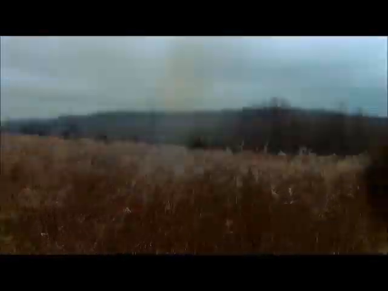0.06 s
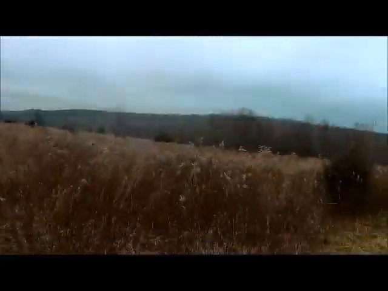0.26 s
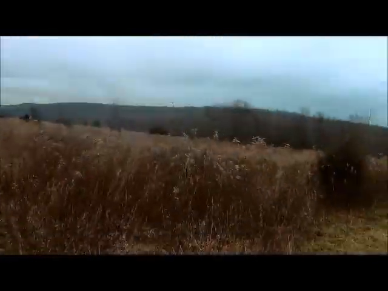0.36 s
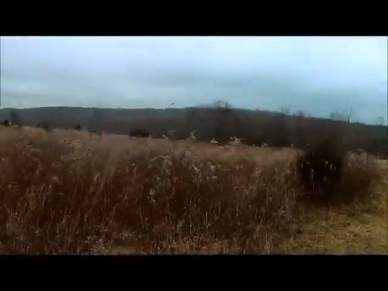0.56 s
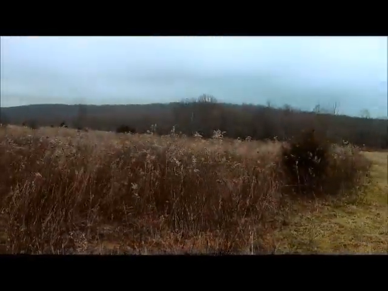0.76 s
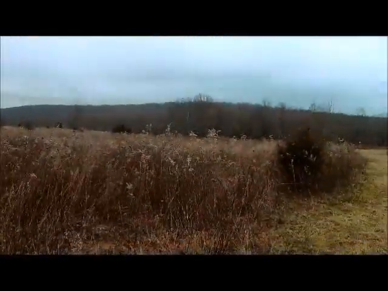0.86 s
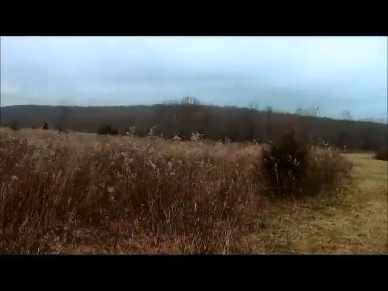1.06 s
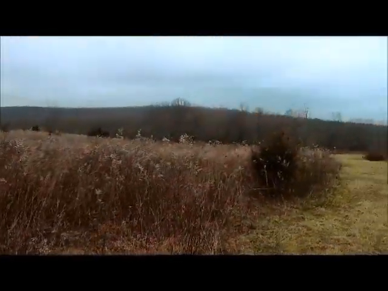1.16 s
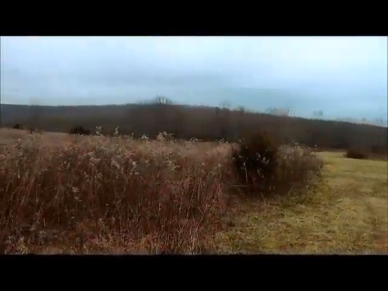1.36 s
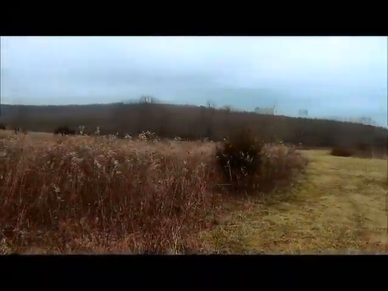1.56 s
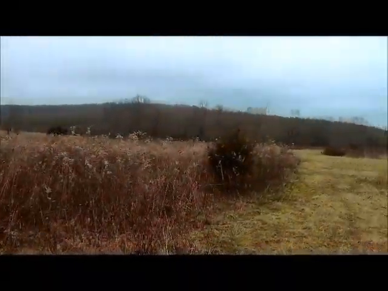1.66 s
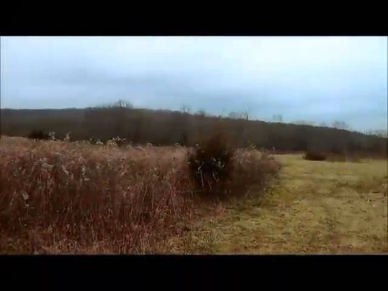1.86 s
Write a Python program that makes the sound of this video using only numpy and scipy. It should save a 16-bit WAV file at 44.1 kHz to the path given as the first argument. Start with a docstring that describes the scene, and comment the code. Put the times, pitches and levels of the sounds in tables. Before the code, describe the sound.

One loud shotgun shot goes off close to the microphone, distorting for an instant. A small metallic click follows, then echoes roll back across the open field and die away, leaving a faint low wind.

```python
"""One shotgun blast in an open field. Light wind blows, then the shot cracks and booms,
overloading a nearby camera microphone. Tall grass scatters a short hiss, bass rolls along the
ground, the barrel hums and the action (the gun's moving parts) clicks. Nearby trees throw the shot
back, then the far tree line and the hills. A few faint handling ticks sound as the echoes fade."""
import sys
import numpy as np
from scipy import signal
from scipy.fft import rfft, irfft
from scipy.io import wavfile
from scipy.ndimage import uniform_filter1d

SR = 44100
rng = np.random.default_rng(int(sys.argv[2]) if len(sys.argv) > 2 else 0)


def file_out(sig):
    """Save sig as 16-bit WAV at sys.argv[1]."""
    # one column per channel
    cols = np.atleast_2d(sig).T
    # limit, then scale
    lim = np.clip(cols, -1, 1)
    pcm = np.round(lim * 32767).astype(np.int16)
    wavfile.write(sys.argv[1], SR, pcm)


N = 83790
T = np.arange(N) / SR
HZ = np.fft.rfftfreq(2 * N, 1 / SR)
SHOT_S = .2358

# A colour says how strong the low and high sounds are. Each row: frequency in Hz, relative level in dB.
CRACK_COLOUR = [(30, -11.5), (300, -15), (1500, -6.5), (2800, 3.5), (5000, 4), (8000, -6), (11500, -19),
                (15000, -12.5)]
BOOM_COLOUR = [(25, -6.5), (65, 10), (110, -2), (175, -1.5), (320, -0.5), (450, 2.5), (800, -1.5),
               (2000, -3.5), (4500, -9), (8000, -4.5), (12000, -34.5), (15000, -23.5)]
# The low push of the muzzle gas. Each row: pitch in Hz, level in dB, seconds to fade by 60 dB.
GAS_PUSH = [(61.2, -7.5, 0.044), (182, -6.5, 0.057), (441.5, -7.5, 0.033)]


def blast():
    """A bright crack, then the muzzle boom and its low push, with a brief chirp of distortion."""
    crack = amp(-4) * colour(burst(delay_s=0, hold_s=.0085, fade_s=.022), CRACK_COLOUR)
    boom = amp(-4.5) * colour(burst(delay_s=.0066, hold_s=.0092, fade_s=.014), BOOM_COLOUR)
    return crack + boom + distortion_chirp() + ring(GAS_PUSH, start_s=SHOT_S + .0085)


def burst(delay_s, hold_s, fade_s):
    """A rush of churning gas that starts at once, holds and collapses."""
    age = T - SHOT_S - delay_s
    return scatter(0, window=48) * (age >= 0) * amp(-60 * np.maximum(age - hold_s, 0) / fade_s)


def distortion_chirp(delay_s=.0062, length_s=.0036, from_hz=450, to_hz=4700):
    """A very short rising tone, like the camera's sound distorting at the loudest moment."""
    progress = np.clip((T - SHOT_S - delay_s) / length_s, 0, 1)
    hz = from_hz + (to_hz - from_hz) * progress ** 2
    arch = np.sqrt(np.sin(np.pi * progress).clip(0))
    return amp(4) * arch * np.sin(2 * np.pi * np.cumsum(hz * (progress > 0)) / SR)


# The barrel's tones. Each row: pitch in Hz, level in dB, seconds to fade by 60 dB.
BARREL_TONES = [(124, -35, 5), (267, -51.5, 0.98)]


def barrel_hum(damp_at_s=.52, fade_s=.3):
    """The air in the barrel hums after the shot until it is damped."""
    return ring(BARREL_TONES, SHOT_S) * amp(-60 * np.maximum(T - damp_at_s, 0) / fade_s)


# The clicks. Each row: start in seconds, gain in dB.
CLICKS = [(0.3933, -8.5), (0.3945, -8.5)]
# The tones of a click. Each row: pitch in Hz, relative level in dB, seconds to fade by 60 dB.
ACTION_TONES = [(2140, -22.5, 0.042), (3800, -9.5, 0.0048), (5540, -2.5, 0.012), (6310, -3, 0.011),
                (8170, -15, 0.0047)]


def action_clicks():
    """The gun's moving parts knock together and ring briefly."""
    return sum(amp(db) * ring(ACTION_TONES, start) for start, db in CLICKS)


# How the hiss and the bass rise and fall. Each row: time in seconds, level in dB.
GRASS_LEVEL = [(.25, -16.5), (.272, -29), (.30, -36.5), (.335, -40), (.38, -41), (.42, -37.5), (.46, -38),
               (.60, -44.5), (.75, -80)]
ROLL_LEVEL = [(.26, -45.5), (.38, -46), (.48, -39), (.56, -35.5), (.65, -42), (.76, -48), (.85, -54)]
# Their colours. Each row: frequency in Hz, relative level in dB.
GRASS_COLOUR = [(60, -16), (250, -0.5), (450, 1), (750, 4), (1100, 0.5), (2000, -5.5), (4400, 0),
                (7500, -4.5), (10500, -17.5), (15000, -19)]
ROLL_COLOUR = [(30, -18.5), (70, -0.5), (130, -8.5), (230, 2.5), (330, 1.5), (480, -17), (900, -48.5)]


def grass_and_ground():
    """Tall grass scatters the shot into a hiss while bass rolls along the ground."""
    hiss = colour(scatter(2) * level(GRASS_LEVEL), GRASS_COLOUR)
    roll = colour(scatter(0) * level(ROLL_LEVEL), ROLL_COLOUR)
    return hiss + roll


# The wash, a blur of many echoes. Each row: time in seconds, level in dB.
NEAR_WASH = [(.44, -74), (.47, -38), (.51, -36), (.555, -37), (.575, -42), (.65, -41), (.72, -48),
             (.78, -52)]
FAR_WASH = [(.74, -50), (.80, -35.5), (.84, -37.5), (.94, -34), (1.04, -34), (1.14, -36.5), (1.25, -38.5),
            (1.38, -42.5), (1.51, -49.5), (1.65, -49.5), (1.76, -50), (1.9, -51)]
# Colours of the wash and of the slaps, single echoes that keep more of the shot's thump.
# Each row: frequency in Hz, relative level in dB.
NEAR_WASH_COLOUR = [(100, -10), (520, -6), (900, -3), (1400, -3), (2200, -1.5), (4500, 0), (7500, -5),
                    (10500, -15), (15000, -18)]
FAR_WASH_COLOUR = [(40, -28), (90, 5.5), (150, 5), (250, 0.5), (340, -12.5), (480, -7.5), (850, 2.5),
                   (1300, -3.5), (2500, -10), (4500, -14.5), (7500, -22), (11000, -19.5), (15000, -25.5)]
NEAR_SLAP_COLOUR = [(60, -15), (150, 7), (330, -5), (540, -1), (900, 5.5), (1400, 3), (2200, -3),
                    (4500, -3), (7500, -7), (10500, -16.5), (15000, -14)]
FAR_SLAP_COLOUR = [(40, -33), (90, -2.5), (150, 6.5), (250, -4.5), (340, -12.5), (480, -2.5), (850, 2),
                   (1300, -12.5), (2500, -13.5), (4500, -21), (7500, -26), (11000, -24), (15000, -29)]


def trees_and_hills(far_from_s=.75):
    """Nearby trees throw the shot back first, then the far tree line and the hills."""
    near = colour(slaps(0, far_from_s), NEAR_SLAP_COLOUR) + colour(wash(NEAR_WASH), NEAR_WASH_COLOUR)
    far = colour(slaps(far_from_s, np.inf), FAR_SLAP_COLOUR) + colour(wash(FAR_WASH), FAR_WASH_COLOUR)
    return near + dull_with_time(far)


# The echoes that stand out. Each row: arrival in seconds, level in dB, spread in seconds.
SLAPS = [(.468, -25, 0.0018), (.478, -23.5, 0.0038), (0.499, -25.5, 0.0035), (0.552, -24.5, 0.0038),
         (.585, -33, 0.0025), (0.599, -25, 0.00085), (0.646, -28.5, 0.0021), (.659, -33.5, 0.0048),
         (0.701, -30.5, 0.0014), (0.792, -21.5, 0.0025), (0.836, -24.5, 0.0041), (0.852, -21, 0.0076),
         (.885, -26, 0.0027), (.899, -27.5, 0.0056), (.925, -29, 0.0077), (0.957, -28.5, 0.005),
         (.9795, -19, 0.0022), (0.987, -25.5, .003), (1.031, -27.5, 0.0057), (1.079, -25, 0.0026),
         (1.124, -32, .004), (1.696, -49, 0.0052), (1.773, -43, 0.0046), (1.85, -46, .008)]
TREE_UNEVEN_DB = 4.5


def slaps(from_s, to_s, clean_db=-6.5):
    """Each slap is one clean reflection inside a tight cluster of weaker ones."""
    power, clean = np.zeros(N), np.zeros(N)
    for arrival, db, spread in SLAPS:
        if from_s <= arrival < to_s:
            power += amp(db) ** 2 * np.exp(-2 * abs(T - arrival) / spread)
            clean += amp(db + clean_db) * np.sqrt(spread * SR) * np.sinc((T - arrival) * SR)
    return scatter(TREE_UNEVEN_DB, window=300) * np.sqrt(power) + clean


def wash(curve, flutter_db=1, flutter_s=.0057):
    """The trees stand in uneven groups, so their blurred echoes come in quick waves."""
    reflections = scatter(TREE_UNEVEN_DB, window=300) * level(curve)
    smoothing = np.exp(-(np.pi * flutter_s * HZ / 2) ** 2)
    waves = irfft(rfft(rng.standard_normal(2 * N)) * smoothing)[:N]
    return reflections * amp(flutter_db * unit(waves))


# How later echoes dull. Each row: frequency in Hz, loss in dB per second (below zero is a boost).
ECHO_DULLING = [(400, -1.5), (1200, 3.5), (2500, 10), (5000, 27), (8000, 17.5), (11000, 3.5)]


def dull_with_time(x, unchanged_at_s=.76):
    """Later echoes are duller: the upper mids fade fastest, while the highest treble hardly fades."""
    hz, times, spectrum = signal.stft(x, SR, nperseg=256)
    later_s = np.clip(times - unchanged_at_s, -.1, .6)
    loss_db = np.interp(hz, *np.transpose(ECHO_DULLING))[:, None] * later_s
    return signal.istft(spectrum * amp(-loss_db), SR, nperseg=256)[1][:N]


# The ticks. Each row: start in seconds, level in dB.
TICKS = [(0.098, -55), (1.329, -49.5), (1.370, -52), (1.672, -54.5), (1.688, -63), (1.840, -58),
         (1.890, -59.5)]
# Their colour. Each row: frequency in Hz, relative level in dB.
TICK_COLOUR = [(200, -20), (2000, -8), (4500, 4.5), (7000, 0), (10000, -7), (15000, -48)]


def handling(decay_s=.0038):
    """Hands on the gear make small dry ticks."""
    envelope = sum(amp(db) * (T >= start) * np.exp(-abs(T - start) / decay_s) for start, db in TICKS)
    return colour(scatter(1.5) * envelope, TICK_COLOUR)


# The wind's colour. Each row: frequency in Hz, relative level in dB.
WIND_COLOUR = [(20, -1), (45, 2.5), (100, -3), (170, -8.5), (300, -21), (800, -23), (2000, -30),
               (4500, -35), (8000, -40.5), (15000, -44)]


def wind():
    """Light wind makes a steady, low rush."""
    return amp(-49) * colour(rng.standard_normal(N), WIND_COLOUR)


def amp(db):
    """Turns decibels into a number to multiply by."""
    return 10 ** (np.asarray(db) / 20)


def unit(x):
    """Scales a signal to an average power of 1."""
    return x / np.sqrt(np.mean(x ** 2) + 1e-20)


def shape(x, gain):
    """Turns each frequency up or down, with timing that lets nothing ring ahead of the sound."""
    log_gain = np.log(np.maximum(gain, 1e-5))
    mirrored = np.r_[log_gain, log_gain[-2:0:-1]]
    phase = -signal.hilbert(mirrored).imag[:len(gain)]
    return irfft(rfft(x, 2 * N) * gain * np.exp(1j * phase))[:N]


def colour(x, points):
    """Gives white noise a colour and keeps its power."""
    hz, db = np.transpose(points)
    curve_db = np.interp(np.log(HZ + 1), np.log(hz), db)
    return shape(x, unit(amp(curve_db)))


def level(points):
    """Follows a level curve, silent before it and dying away after it."""
    times, db = np.transpose(points)
    fade_db = 100 * np.maximum(T - times[-1], 0)
    return amp(np.interp(T, times, db) - fade_db) * (T >= times[0])


def scatter(uneven_db, window=128):
    """Noise like many reflections of unequal strength, its power evened out over `window` samples."""
    noise = rng.standard_normal(N) * amp(uneven_db * np.minimum(rng.exponential(1, N), 5))
    return noise / np.sqrt(uniform_filter1d(noise ** 2, window) + 1e-12)


def ring(tones, start_s, attack_s=.00026):
    """Tones that are struck together and each fade at their own speed."""
    age = np.maximum(T - start_s, 0)
    onset = 1 - np.exp(-(age / attack_s) ** 2)
    return onset * sum(amp(db - 60 * age / fade) * np.sin(2 * np.pi * hz * age) for hz, db, fade in tones)


def scene():
    """Adds the gun, its echoes and the background into one channel."""
    gun = blast() + barrel_hum() + action_clicks()
    echoes = grass_and_ground() + trees_and_hills()
    return (gun + echoes + handling() + wind())[None]


# Narrow dips in the treble. Each row: frequency in Hz, width in Hz, depth in dB.
TREBLE_DIPS = [(5990, 690, 11.5), (5990, 170, 11.5), (12100, 830, 8.5)]


def record(dry, bass_cut_hz=23.8, ceiling=.96, top_hz=15450):
    """The treble gets narrow dips, the deepest rumble is dropped, the microphone overloads on the blast and the
    top is cut."""
    dips_db = sum(depth * np.exp(-((HZ - hz) / width) ** 2) for hz, width, depth in TREBLE_DIPS)
    x = shape(dry[0], amp(-dips_db))
    x = signal.sosfilt(signal.butter(2, bass_cut_hz, "high", fs=SR, output="sos"), x)
    overloaded = x / (1 + (x / ceiling) ** 6) ** (1 / 6)
    treble_cut = signal.firwin(301, top_hz, window=("kaiser", 8), fs=SR)
    return signal.oaconvolve(overloaded, treble_cut, "same")[None]


dry = scene()
out = record(dry)
file_out(out)
```